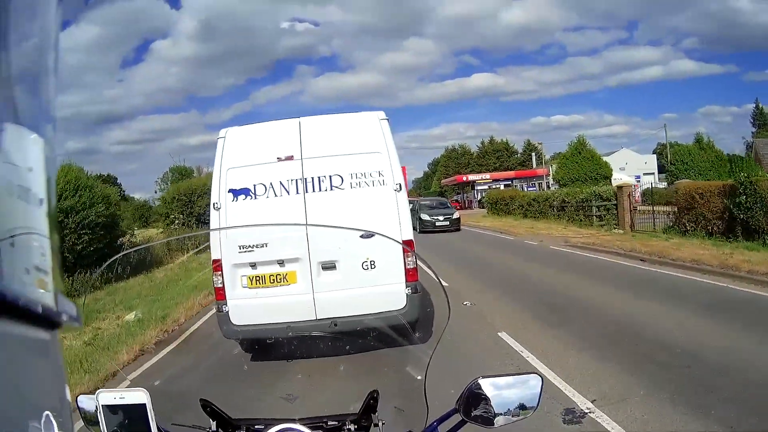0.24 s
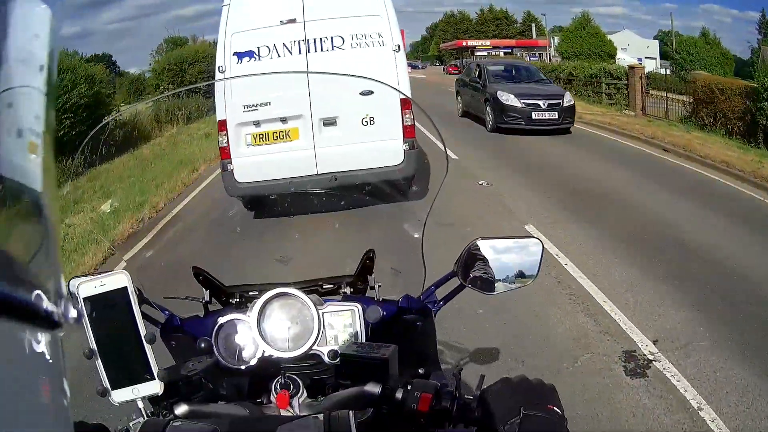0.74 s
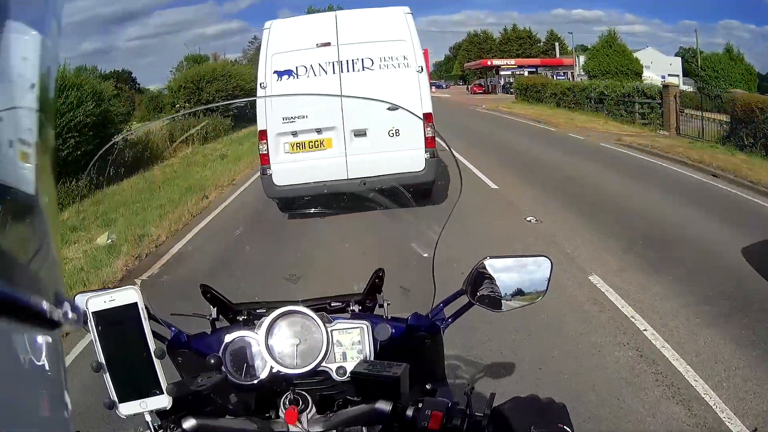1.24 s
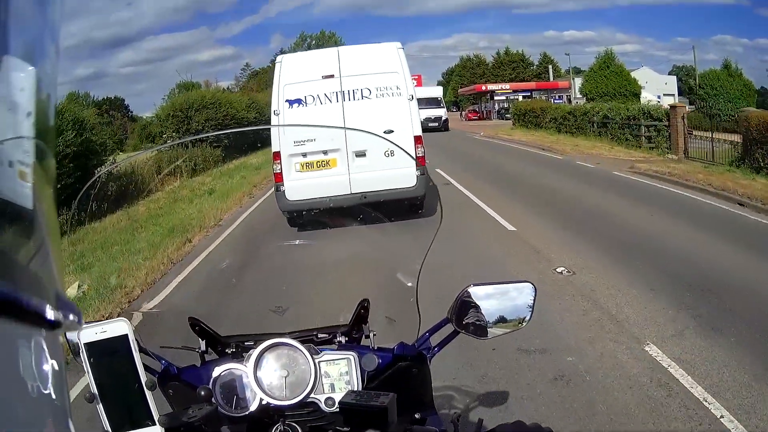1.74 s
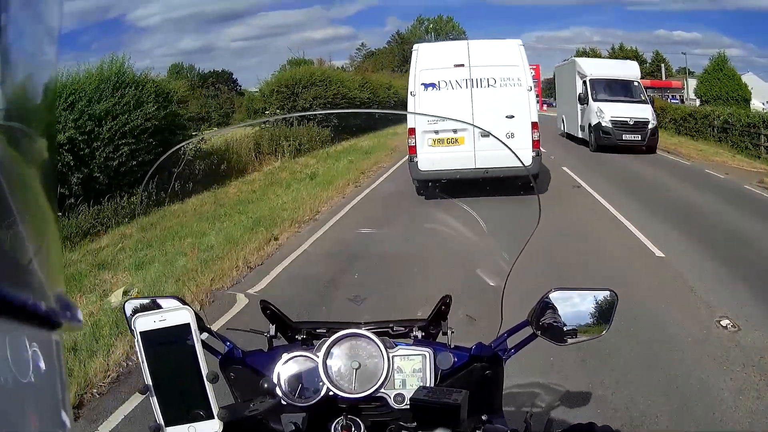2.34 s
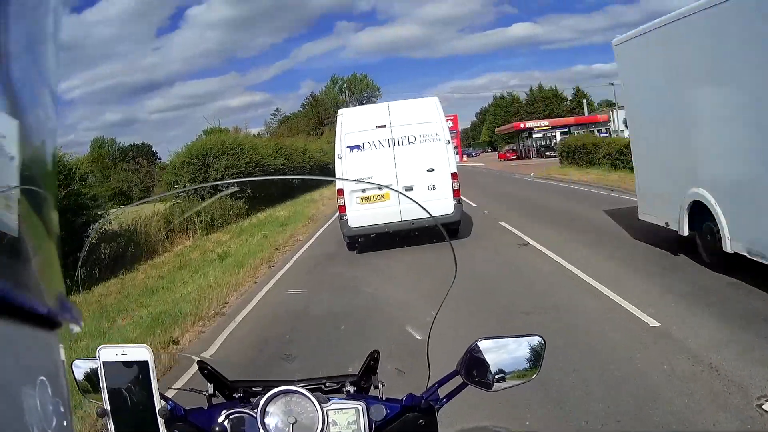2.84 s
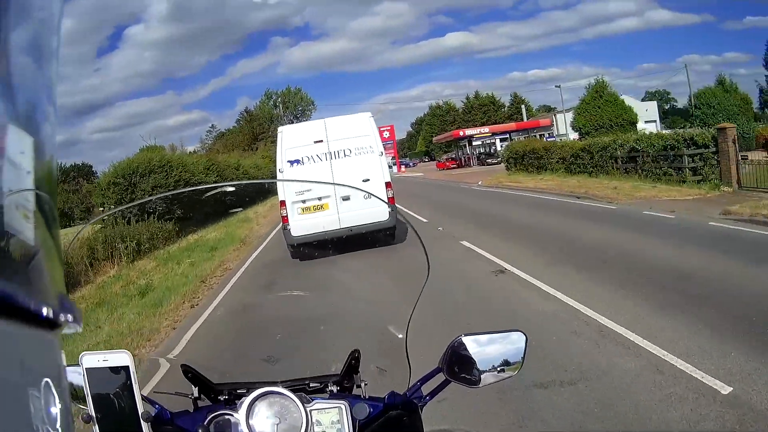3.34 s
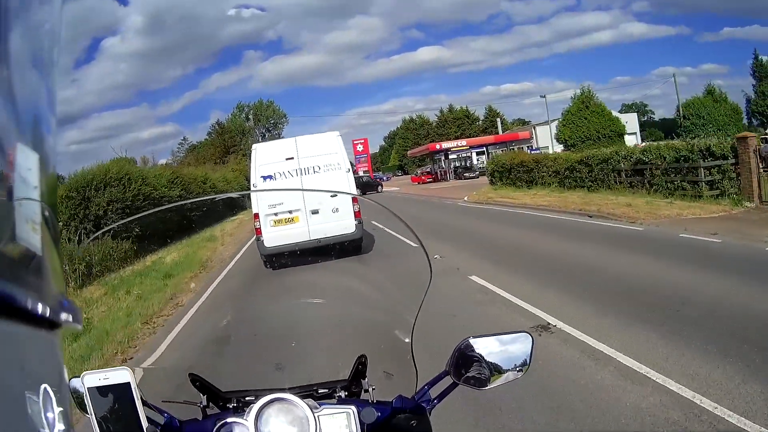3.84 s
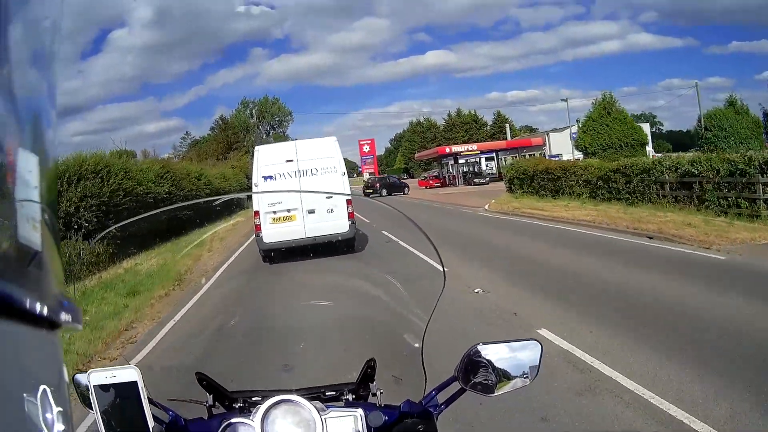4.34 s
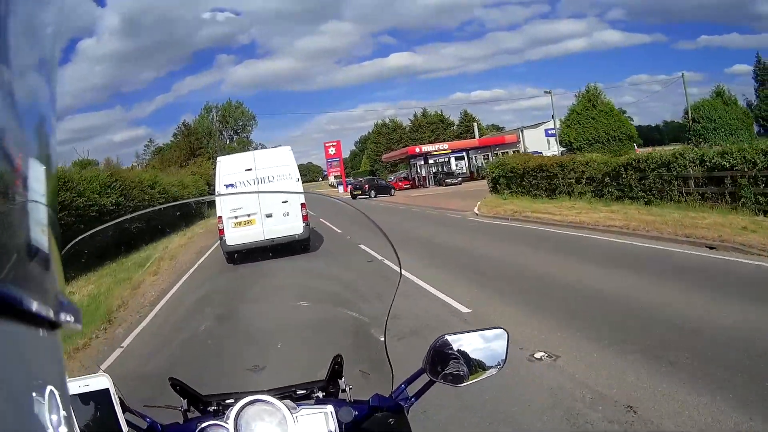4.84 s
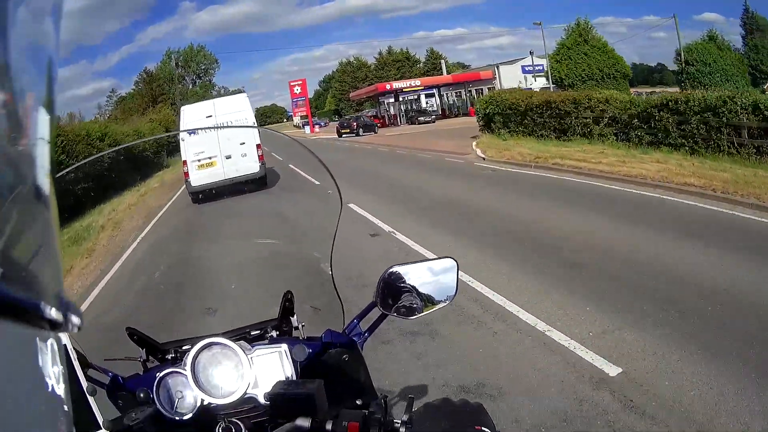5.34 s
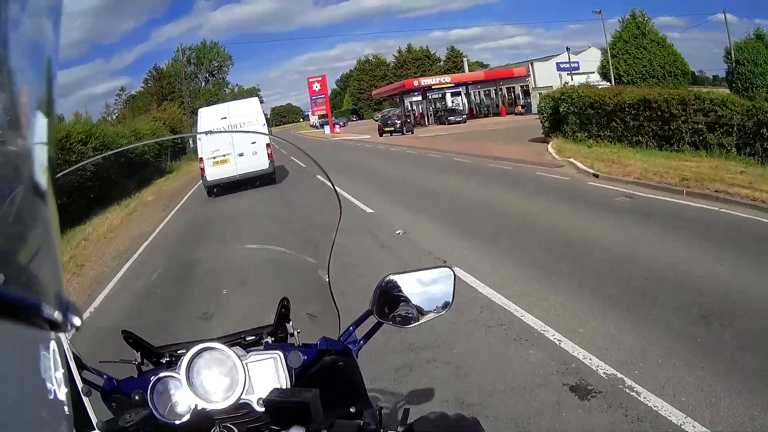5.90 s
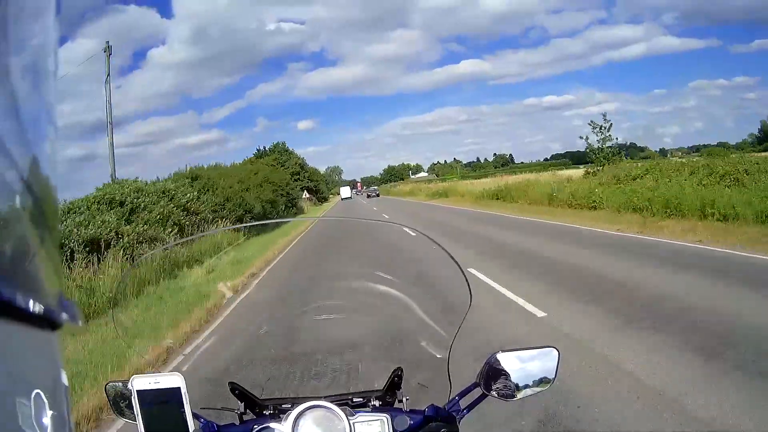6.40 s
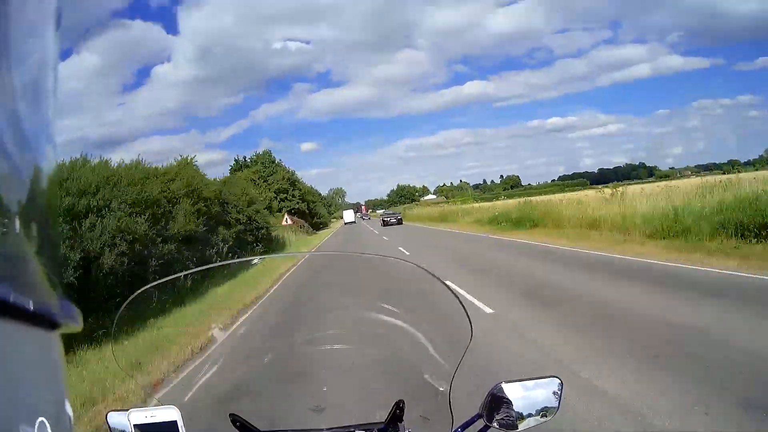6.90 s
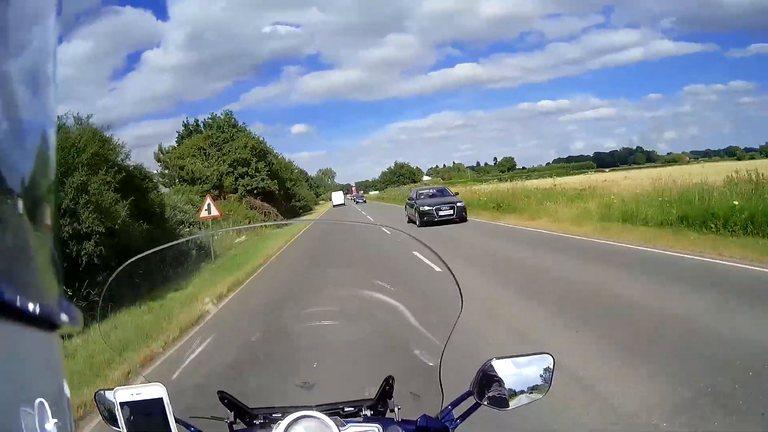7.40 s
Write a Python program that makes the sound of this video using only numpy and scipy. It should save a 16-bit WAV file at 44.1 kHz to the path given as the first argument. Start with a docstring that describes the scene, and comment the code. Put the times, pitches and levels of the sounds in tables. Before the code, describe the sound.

Low motorcycle throb with faint brake singing and two passing tyre whooshes, rising revs, then suddenly fierce, crackling wind gusts overwhelm the microphone.

```python
"""Motorcycle ride, then open-road wind

Heard from the rider's helmet, a motorcycle thuds along slowly while its brake faintly sings (summed sines).
A car and a box van pass the other way as bands of tyre noise that swell and drop in pitch.
Then the engine speed climbs, and gear whines locked to the engine cycle rise with it.
The scene cuts to the open road, where gusts of coloured noise batter the microphone.
"""
import sys
import numpy as np
from scipy import signal
from scipy.fft import rfft, irfft, next_fast_len
from scipy.io import wavfile
from scipy.ndimage import map_coordinates

SR = 44100
rng = np.random.default_rng(int(sys.argv[2]) if len(sys.argv) > 2 else 0)


def bounce(signal):
    """Save signal as a 16-bit WAV file at the path given by the first command-line argument."""
    frames = np.transpose(np.atleast_2d(signal))
    limited = np.clip(frames, -1, 1)
    pcm = np.round(limited * 32767).astype(np.int16)
    wavfile.write(sys.argv[1], SR, pcm)


N = 337806
CUT_S = 6.249  # the slow ride gives way to the open road
TOP_HZ = 15300  # upper band limit of the whole sound

# Noise colours, only their shape counts: freq_hz, level_db
# slow air round the helmet
DRAUGHT_COLOUR = [(15, -16), (30, -3), (90, 4), (170, -0.5), (260, -2.5), (380, -11), (550, -19.5),
                  (900, -29), (3000, -81)]
# large eddies, middling eddies, air ripping over the microphone port, the finest eddies
THUMP_COLOUR = [(10, 3.5), (22, 7.5), (55, -1.5), (110, 2.5), (150, -0.5), (200, -17), (400, -44),
                (1200, -120)]
BUFFET_COLOUR = [(80, -5), (140, -0.5), (190, 2), (330, 0), (450, -2.5), (580, -10), (720, -11.5),
                 (920, -10), (1100, -11), (1500, -19.5), (2200, -37), (5000, -120)]
TEAR_COLOUR = [(400, -20), (750, -4), (1100, -0.5), (1800, -5), (2400, -2), (3800, -15), (4800, -12.5),
               (6000, -28), (6900, -22), (8200, -31), (9900, -33.5), (11200, -31), (14000, -44),
               (15500, -64)]
FIZZ_COLOUR = [(2500, -25), (4700, 14), (6000, -21), (6900, 10), (9500, -18), (11300, 2), (14000, -11),
               (15500, -17)]
# tread roar, and churned air behind a vehicle
TYRE_COLOUR = [(200, -15), (330, -8), (560, -14), (780, -0.5), (930, 5), (1200, -3.5), (1500, -11),
               (1800, -32), (2150, -13.5), (2600, -43), (3700, -37), (4500, -34), (5400, -52), (9000, -57)]
WAKE_COLOUR = [(130, -10), (230, 6), (380, 9), (560, -2), (800, 13.5), (1500, 0.5), (2100, -5),
               (3000, -10.5), (3800, -19.5), (4600, -23), (5800, -27), (6800, -28.5), (10000, -37.5),
               (15000, -42)]
# engine and road hiss
CASING_COLOUR = [(250, -15), (450, -3), (580, -12.5), (780, -1), (950, 3), (1250, -5.5), (1650, -8),
                 (2000, -13), (2300, -11.5), (2900, -13), (3500, -20), (4100, -23), (4700, -24),
                 (5800, -28.5), (6800, -29.5), (8500, -31.5), (13500, -33), (15500, -50)]

# Level of the draught: time_s, level_db
DRAUGHT_LEVEL = [(0, -47), (1.7, -44.5), (2.6, -43), (3.1, -39.5), (3.5, -47.5), (3.9, -41), (4.7, -43),
                 (5.5, -40), (6.24, -41.5)]

# Gusts over the steady wind: peak_s, half_length_s, thump_swell_db, tear_swell_db
GUSTS = [(6.251, 0.023, 9, 11.5), (6.342, 0.038, 6, 10), (6.409, 0.033, 10.5, 7), (6.51, 0.027, 6, 4.5),
         (6.606, 0.064, 4.5, 0.5), (6.702, 0.0056, 9, 3), (6.781, 0.023, 5, 5), (6.89, 0.08, 2, 2.5),
         (6.975, .04, 7.5, 5.5), (7.08, 0.045, 0, 6), (7.287, 0.027, 1.5, 6), (7.469, 0.032, 7, 6),
         (7.543, 0.026, 9.5, 5), (7.655, 0.0099, 1, -0.5)]
# Sharp slaps of wind: peak_s, thump_db, rip_db
SLAPS = [(6.251, -18, -21.5), (6.336, -30, -25.5), (6.406, -14.5, -39), (6.503, -25, -27.5),
         (7.578, -36, -27)]
SLAP_HALF_LENGTH_S = 0.0027
# steady wind that the gusts swell
THUMP_DB, BUFFET_DB, TEAR_DB = -24, -22.5, -36
# the middling eddies take a share of both swells of a gust
BUFFET_PER_THUMP, BUFFET_PER_TEAR = 0.24, 0.39

# Oncoming vehicles: closest_s, tread_db, approach_s, retreat_s, wake_db
TRAFFIC = [(1.12, -39.5, .2, .15, -44.5), (2.78, -35, .29, 0.23, -40)]
# Short knocks and rattles along the road: start_s, level_db, ring_hz, t60_s
KNOCKS = [(1.084, -33, 1000, .04), (1.132, -47, 2750, .07), (1.62, -62, 4300, .06),
          (2.174, -30, 1300, .022), (2.695, -33, 1200, .02), (3.27, -59, 3600, .06), (3.42, -48, 420, .35),
          (4.499, -48, 1700, .05), (4.89, -60, 4400, .1)]
# Brake disc modes: pitch_hz, loudest_s, spread_s, level_db
DISC_MODES = [(2217, 1.84, 0.31, -61.5), (2218, .3, 3.2, -68.5), (2780, 0.27, 0.8, -72),
              (3600, 1.6, 0.3, -77)]
# One brief thin squeak: time_s, pitch_hz, level_db
SQUEAK = [(5.0, 1434, -90), (5.035, 1460, -52), (5.1, 1456, -55), (5.18, 1496, -53), (5.23, 1513, -88)]
# Gear and chain whines: multiple_of_engine_cycle, loudest_s, spread_s, level_db, flutter_0_to_1
WHINES = [(9.62, 6.1, .17, -51.5, 0.17), (11.02, 5.89, 0.33, -48, 0.14), (14.1, 5.22, 0.23, -54, 0),
          (16.5, 6.3, 0.43, -59.5, 0), (21.8, 5.63, 0.47, -63.5, 0.2), (23.67, 4.05, 0.76, -57.5, 1),
          (38.15, 5.5, 0.51, -69, 0.6), (48.1, 5.13, 0.6, -66.5, 1)]

# Engine speed: time_s, cycles_hz
ENGINE_SPEED = [(0.0, 33.1), (0.19, 30.0), (0.45, 32.6), (0.86, 33.4), (0.97, 31.9), (1.06, 36.2),
                (1.41, 35.7), (1.67, 31.5), (2.0, 42.8), (2.28, 44.8), (2.74, 39.9), (3.14, 41.1),
                (3.31, 43.6), (3.58, 40.7), (4.39, 49.9), (4.98, 58.8), (5.54, 70.5), (6.24, 87.2)]
# Strength of exhaust orders 1 to 4, added to the silencer: level_db
THUD_DB = [2.95, 0.4, -4, -6]
# Silencer boom, so each order swells as it passes through the peak: freq_hz, level_db
SILENCER = [(30, -55), (45, -45.5), (62, -45), (72, -40), (84, -34.5), (100, -33.5), (130, -36.5),
            (150, -40), (175, -49.5), (260, -51.5)]
# Exhaust growl: multiple_of_engine_cycle, level_db
OVERTONES = [(1.5, -74), (2.5, -59), (3.5, -69), (4.5, -78), (5, -57), (5.5, -55), (6, -63)]
# Throttle pull on the growl: time_s, pull_db
THROTTLE = [(0, -26), (1.7, -3), (2, -5), (2.8, 2), (3.7, 1), (4.4, -5), (5.3, 6.5), (6.24, -5)]
# the thud grows with engine speed, either side of the speed in slow traffic
CRUISE_HZ, REV_DB_PER_OCTAVE = 42, 5
# the engine falters once, dipping the thud
STUMBLE_S, STUMBLE_HALF_LENGTH_S, STUMBLE_DB = 0.93, 0.037, -7
# clatter at low revs, and its rise per octave above an engine speed
CLATTER_DB, CLATTER_RISE_DB, CLATTER_FROM_HZ = -52, 3.5, 46


def amp(db):
    """Decibels to gain."""
    return 10 ** (np.asarray(db) / 20)


def unit(x):
    """Scale to rms 1."""
    return x / np.sqrt(np.mean(x ** 2) + 1e-20)


def clock():
    """The time of each sample in seconds."""
    return np.arange(N) / SR


def curves(rows):
    """Draw one automation curve for each column after the time."""
    times, *columns = np.transpose(rows)
    return [np.interp(clock(), times, column) for column in columns]


def bump(s, half_length):
    """A smooth swell to 1 at time s, fallen to 1/e a half length away."""
    return np.exp(-((clock() - s) / half_length) ** 2)


def bell(s, spread):
    """A flat-topped swell to 1 at time s, with long tails."""
    return 1 / np.hypot(1, ((clock() - s) / spread) ** 2)


def wobble(rate):
    """A smooth random curve, rate knots a second."""
    knots = rng.standard_normal(int(N * rate / SR) + 4)
    return map_coordinates(knots, [clock() * rate])


def wavering_phase(hz, waver_hz):
    """Phase of a tone whose pitch wavers at random."""
    return 2 * np.pi * np.cumsum(hz + waver_hz * wobble(60)) / SR


def filtered(x, response):
    """Shape the spectrum of x by a response of frequency."""
    size = next_fast_len(N + SR // 2)
    spectrum = rfft(x, size) * response(np.fft.rfftfreq(size, 1 / SR))
    return irfft(spectrum, size)[:N]


def noise(colour, swell=1):
    """Noise of rms 1, swelling at its source and then coloured."""
    freq, db = np.transpose(colour)

    def response(hz):
        return amp(np.interp(np.log(hz + 1), np.log(freq), db))

    return unit(filtered(swell * rng.standard_normal(N), response))


def draught(angle):
    """Low air and exhaust rumble round the helmet, pulsing gently once an engine cycle."""
    level = amp(curves(DRAUGHT_LEVEL)[0] + 0.51 * wobble(12))
    return level * noise(DRAUGHT_COLOUR, amp(0.51 * np.cos(angle)))


def gale(fizz_db=-55, eddy_db=1, rip_db=1.68, crackle_db=2.5, steepness=2.9):
    """Eddies thump the microphone and tear into a crackling hiss that brightens with force."""
    eddies = wobble(55)
    thump_swell = sum(db * bump(s, length) for s, length, db, _ in GUSTS)
    tear_swell = sum(db * bump(s, length) for s, length, _, db in GUSTS)
    slap_pulses = np.array([bump(s, SLAP_HALF_LENGTH_S) for s, _, _ in SLAPS])
    _, slap_thump_db, slap_rip_db = np.transpose(SLAPS)

    # steady wind, gusts and slaps together drive the eddies and the tearing
    buffet_db = BUFFET_DB + BUFFET_PER_THUMP * thump_swell + BUFFET_PER_TEAR * tear_swell
    push = np.hypot(amp(buffet_db), amp(slap_thump_db) @ slap_pulses)
    force = np.hypot(amp(TEAR_DB + tear_swell), amp(slap_rip_db) @ slap_pulses)
    crackle = amp(rip_db * eddies + crackle_db * wobble(700))

    thump = amp(THUMP_DB + thump_swell) * noise(THUMP_COLOUR)
    buffet = push * unit(noise(BUFFET_COLOUR) * amp(eddy_db * eddies))
    tear = force * noise(TEAR_COLOUR, crackle)
    # the fizz sits at its own level when the force is -31.5 dB and grows faster than the force
    fizz_level = amp(fizz_db) * (force / amp(-31.5)) ** steepness
    fizz = fizz_level * noise(FIZZ_COLOUR, crackle ** steepness)
    return thump + buffet + tear + fizz


def traffic(doppler=.11, wake_lag_s=0.14, wake_spread_s=0.21):
    """Tyre roar swells as each vehicle nears and drops in pitch going by; its wake hisses just after."""
    out = np.zeros(N)
    for closest, tread_db, approach, retreat, wake_db in TRAFFIC:
        t = clock() - closest
        along = t / np.where(t < 0, approach, retreat)
        distance = np.hypot(1, along)  # 1 at the closest point
        # reading the noise faster, then slower, bends its pitch
        read_position = np.cumsum(1 - doppler * along / distance)
        roar = map_coordinates(noise(TYRE_COLOUR), [read_position], order=3, mode="wrap")
        out += amp(tread_db + 0.69 * wobble(24.0)) * roar / distance ** 2.03
        out += amp(wake_db) * noise(WAKE_COLOUR) * bell(closest + wake_lag_s, wake_spread_s)
    return out


def knocks():
    """Short knocks and rattles along the road: noise bursts, each ringing in its own band."""
    out = np.zeros(N)
    t = np.arange(SR // 4) / SR
    for start, db, hz, t60 in KNOCKS:
        band = signal.iirpeak(hz, 2.2, SR)
        ring = signal.lfilter(*band, rng.standard_normal(len(t)))
        ring = signal.lfilter(*band, ring)  # a second pass narrows the band
        out[round(start * SR):][:len(t)] += amp(db - 60 * t / t60) * unit(ring)
    return out


def brake(turns_hz=6.9, waver_hz=7, rub_db=4):
    """A pad rubs the disc once a wheel turn, and the disc modes sing thin wavering notes."""
    out = np.zeros(N)
    turn = 2 * np.pi * turns_hz * (clock() - 2.01)
    rub = amp(rub_db * (np.cos(turn) + 0.82 * wobble(30.92)))
    for hz, loudest, spread, db in DISC_MODES:
        note = np.sin(wavering_phase(hz, waver_hz))
        out += amp(db) * unit(rub * note) * bell(loudest, spread)
    return out


def squeak(waver_hz=8):
    """One short wavering sine note as the bike gathers speed."""
    hz, db = curves(SQUEAK)
    return amp(db) * unit(np.sin(wavering_phase(hz, waver_hz)))


def gears(angle, waver_db=1.8):
    """Each mesh sings at a multiple of the engine cycle and swells round its own moment."""
    out = np.zeros(N)
    for multiple, loudest, spread, db, flutter in WHINES:
        swell = amp(db + waver_db * wobble(11)) * bell(loudest, spread)
        # backlash shakes both the strength and the phase of the tone
        backlash = 1 - flutter + flutter * (wobble(130) + 1j * wobble(130))
        whine = np.real(backlash * np.exp(1j * multiple * angle))
        out += swell * unit(whine)
    return out


def clatter(angle, speed, beat_db=-0.5):
    """Valve gear and chain: casing hiss that pulses with the engine and grows at high revs."""
    beat = amp(beat_db * np.cos(angle) + 0.79 * np.cos(2 * angle) + 0.33 * wobble(120))
    drift_db = .6 * wobble(9)
    revs_db = CLATTER_RISE_DB * np.maximum(0, np.log2(speed / CLATTER_FROM_HZ))
    return amp(CLATTER_DB + revs_db + drift_db) * noise(CASING_COLOUR, beat)


def exhaust(angle, speed, uneven_db=0.0, restless_db=3):
    """Low orders through the silencer make one thud a cycle; unequal firings growl under throttle."""
    pipe_hz, pipe_db = np.transpose(SILENCER)
    effort_db = REV_DB_PER_OCTAVE * np.log2(speed / CRUISE_HZ)
    effort_db = effort_db + STUMBLE_DB * bump(STUMBLE_S, STUMBLE_HALF_LENGTH_S)

    thud = np.zeros(N)
    for order, order_db in enumerate(THUD_DB, start=1):
        boom_db = np.interp(np.log(order * speed), np.log(pipe_hz), pipe_db)
        level = amp(effort_db + order_db + boom_db)
        thud -= np.sqrt(2) * level * np.sin(order * angle)

    growl = np.zeros(N)
    for multiple, db in OVERTONES:
        level = amp(db + restless_db * wobble(21))
        growl += level * np.sin(multiple * angle + .5 * wobble(18))
    return thud * amp(uneven_db * wobble(30)) + amp(curves(THROTTLE)[0]) * growl


def scene():
    """The slow ride, then abruptly the open road."""
    speed, = curves(ENGINE_SPEED)
    angle = 2 * np.pi * np.cumsum(speed) / SR  # engine cycle phase
    bike = exhaust(angle, speed) + gears(angle) + clatter(angle, speed)
    bike += brake() + squeak()
    slow_ride = bike + knocks() + draught(angle) + traffic()
    return np.where(clock() < CUT_S, slow_ride, gale())[None]


def record(dry):
    """Soft clipping rounds off the highest peaks, then a steep low-pass cuts the top."""
    clipped = dry[0] / (1 + np.abs(dry[0] / .52) ** 8) ** (1 / 8)
    return filtered(clipped, lambda hz: hz < TOP_HZ)[None]


dry = scene()
out = record(dry)
bounce(out)
```